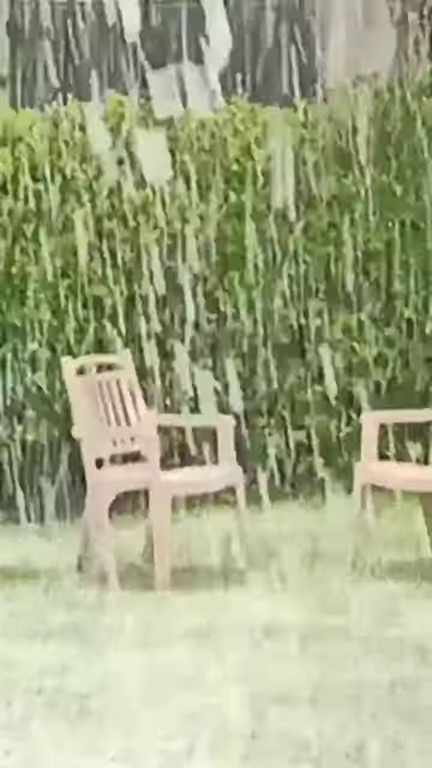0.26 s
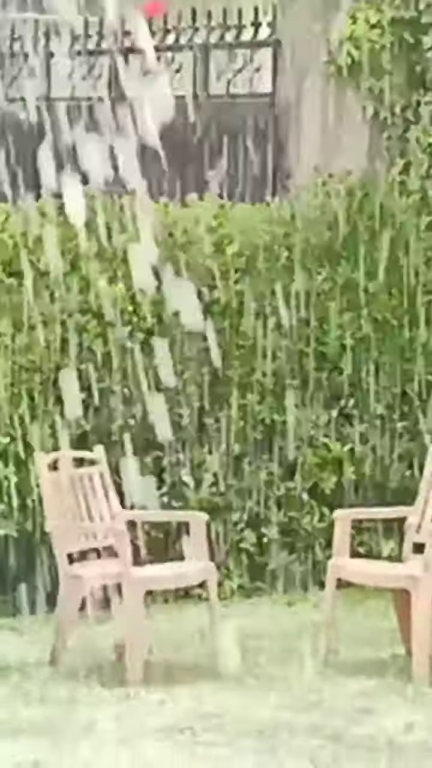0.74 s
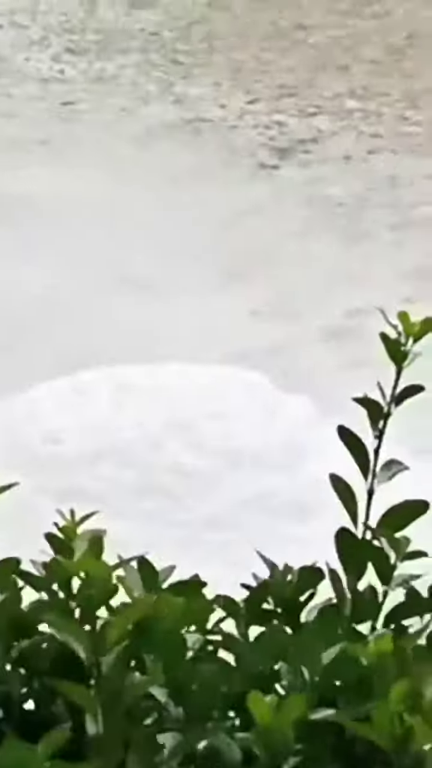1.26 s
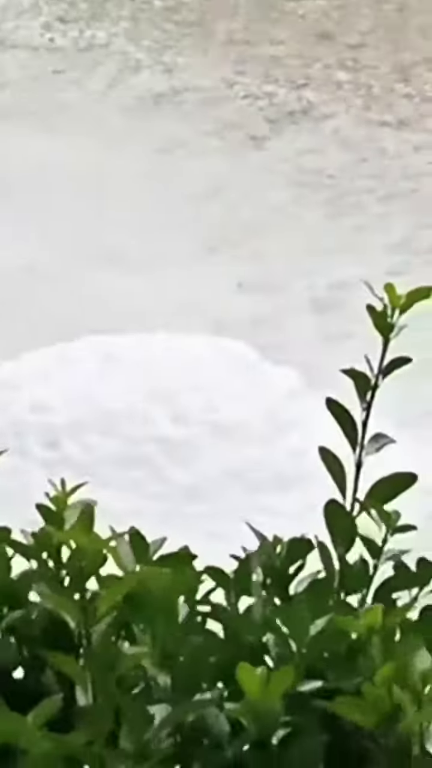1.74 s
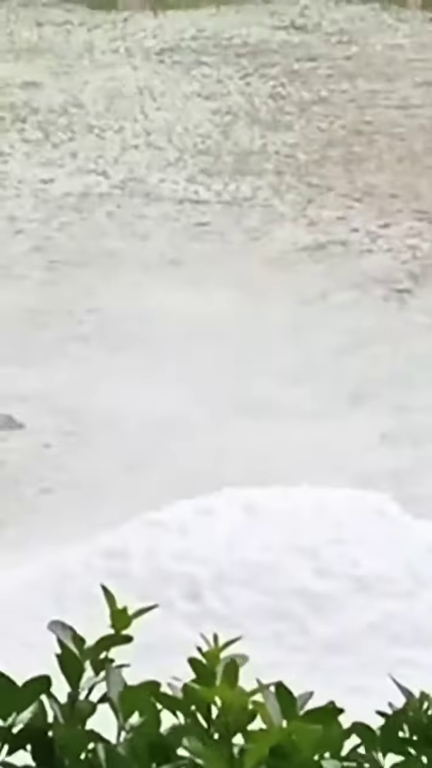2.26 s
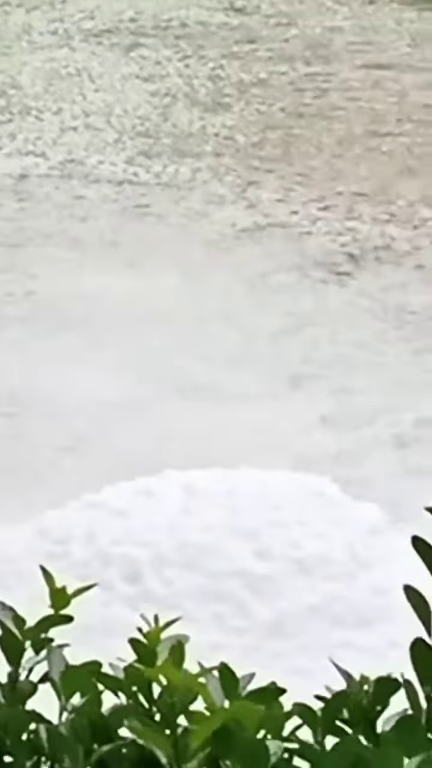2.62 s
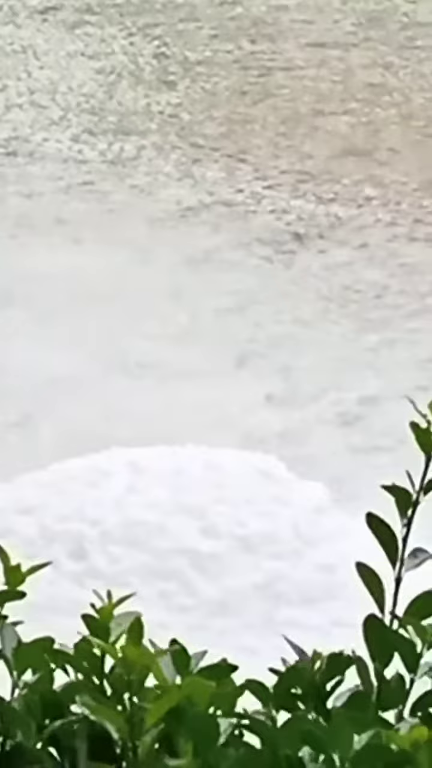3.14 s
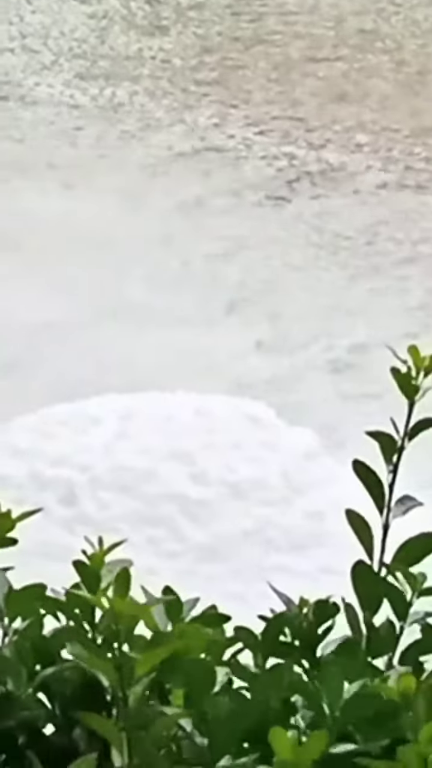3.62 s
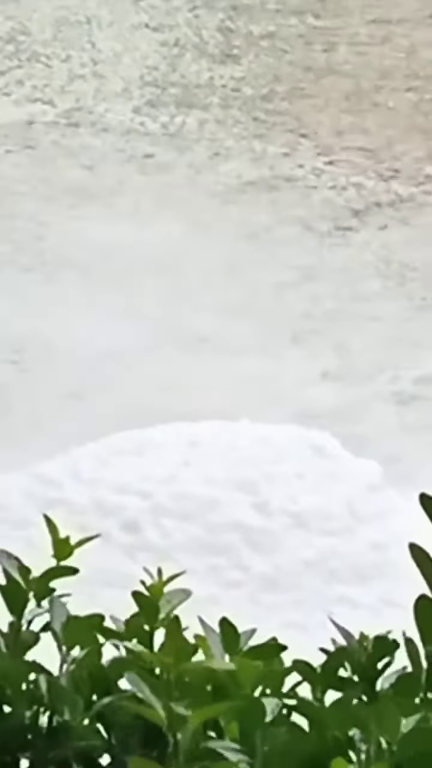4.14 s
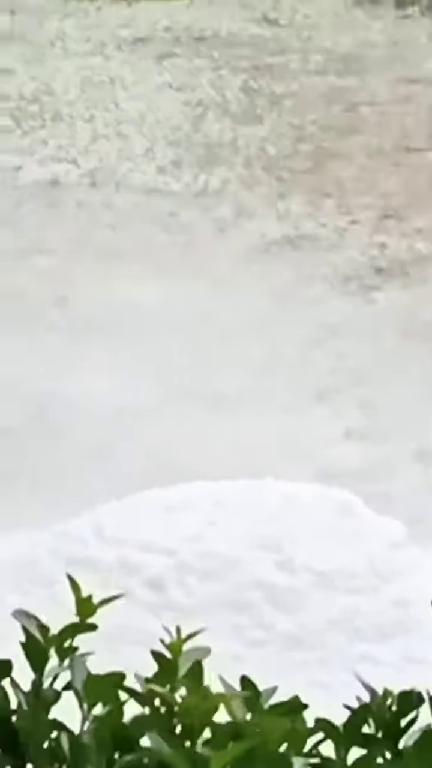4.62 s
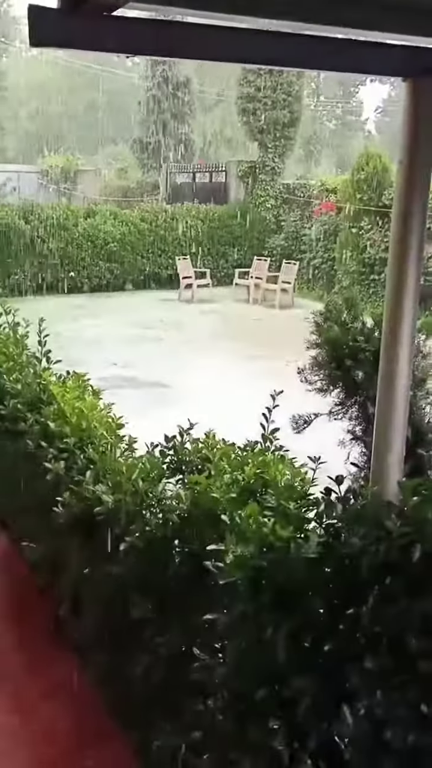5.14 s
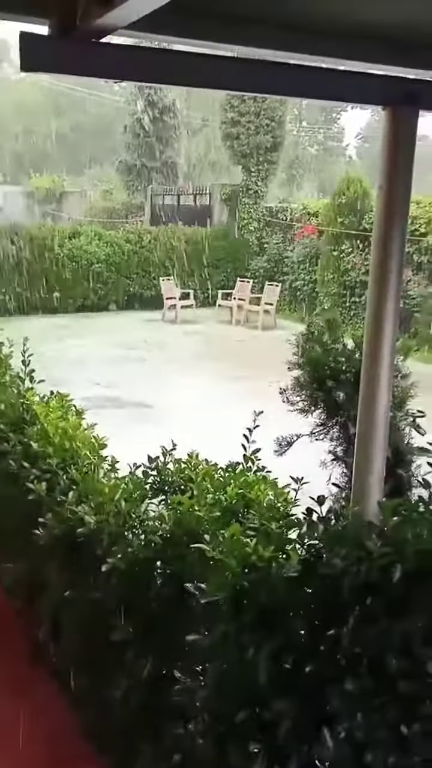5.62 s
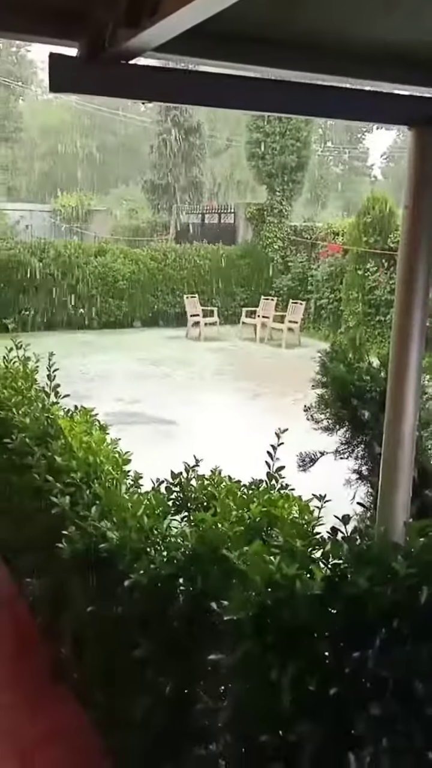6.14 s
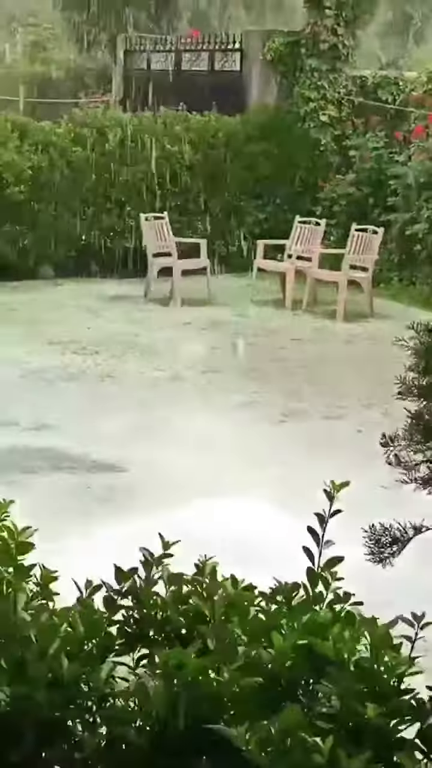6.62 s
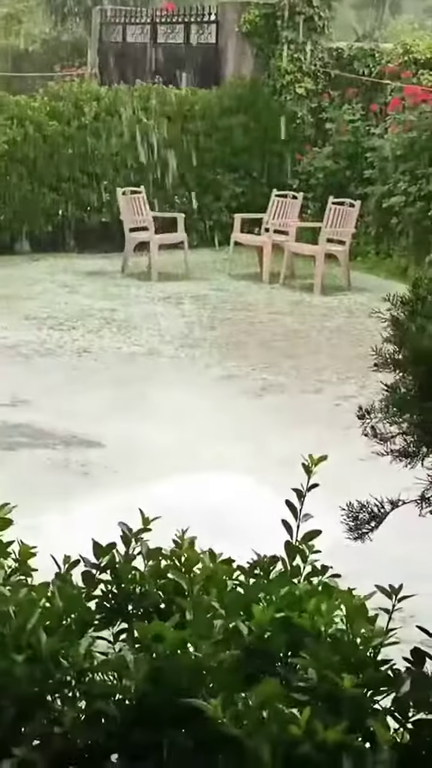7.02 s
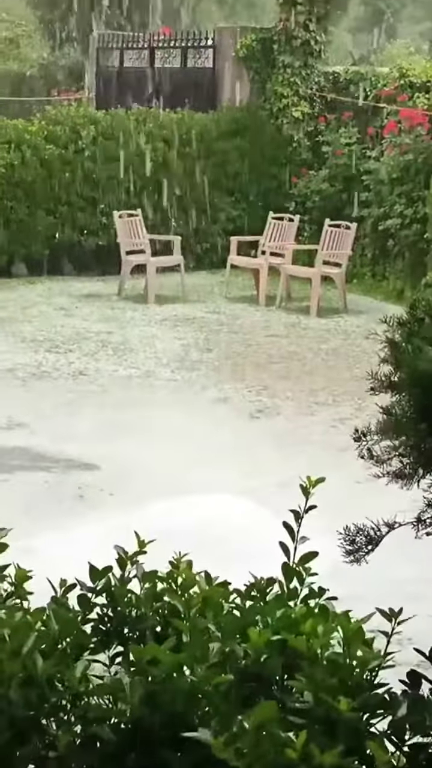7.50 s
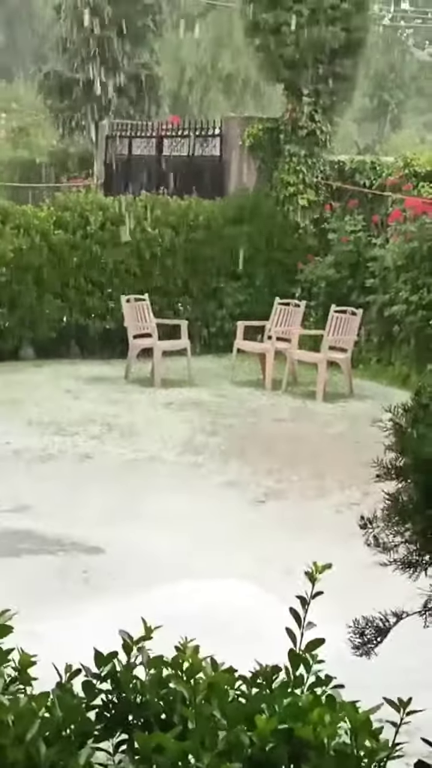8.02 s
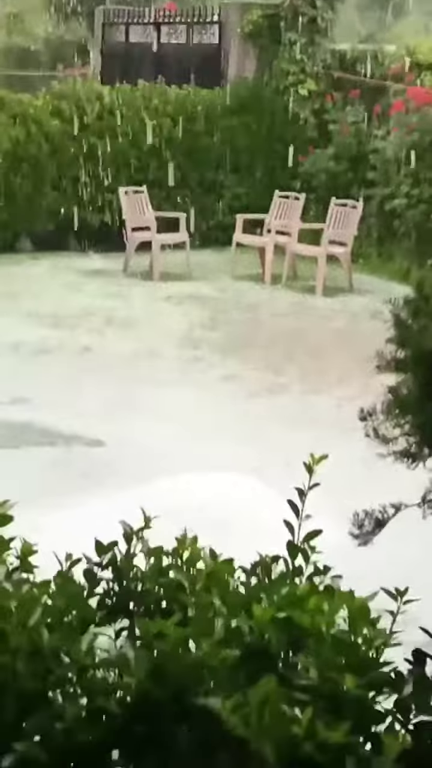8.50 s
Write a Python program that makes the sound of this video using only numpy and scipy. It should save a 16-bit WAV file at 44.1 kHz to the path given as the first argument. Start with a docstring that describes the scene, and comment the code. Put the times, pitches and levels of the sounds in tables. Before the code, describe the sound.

Dense hail fills a garden from start to finish, countless impacts blurring into a broad noisy roar. Beneath it lie a rolling low rumble and dull drumming on roof and soft ground; above, a bright hiss of ice ticking on ice. Ticks on leaves are strongest in the first second, then harder clatter takes over. Soft thuds and a few sharp cracks stand out. Wide stereo from under a porch, mostly leaning left.

```python
"""Heavy hail on a garden, heard from under a porch roof

Countless impacts on lawn and paving merge into a roar of noise; a deep rumble rolls beneath it, and the porch
roof and soft ground drum. Noise bursts and decaying sinusoids make the nearer stones, which patter in the hedge,
tick on the ice already lying, clack and knock. The fall surges and eases a little, with brief bursts of ice,
thuds and a few hard single hits; most of it lies to the left of the two microphones."""
import sys
import numpy as np
from scipy import signal
from scipy.fft import rfft, irfft, next_fast_len
from scipy.io import wavfile
from scipy.ndimage import uniform_filter1d, minimum_filter1d, map_coordinates

SR = 44100
rng = np.random.default_rng(int(sys.argv[2]) if len(sys.argv) > 2 else 0)


def unload_audio(sound):
    """Save the sound as a 16-bit wav file, at the path given as the first command line argument."""
    columns = np.transpose(np.atleast_2d(sound))
    # keep every value between -1 and 1, then stretch to whole-number steps
    steps = np.round(np.clip(columns, -1, 1) * 32767)
    wavfile.write(sys.argv[1], SR, steps.astype(np.int16))


N = 386307


def amp(db):
    """Decibel law: a level in dB becomes a gain in amplitude."""
    return 10 ** (np.asarray(db) / 20)


def unit(x):
    """Normalisation: scale to rms 1."""
    return x / np.sqrt(np.mean(x ** 2) + 1e-20)


def along(points, hz):
    """Logarithmic frequency scale: interpolate (f/Hz, value) points at the frequencies hz."""
    f, v = np.transpose(points)
    return np.interp(np.log(hz + 1), np.log(f + 1), v)


def curves(rows):
    """Linear interpolation in time: one value per sample for each column after t/s."""
    s, *cols = np.transpose(rows)
    return [np.interp(np.arange(N) / SR, s, c) for c in cols]


def wobble(rate):
    """Band-limited randomness: a smooth curve through random knots, rate of them per second."""
    knots = rng.standard_normal(int(N * rate / SR) + 4)
    return map_coordinates(knots, [np.arange(N) * rate / SR])


def filtered(x, response):
    """Convolution theorem: multiply the spectrum of x by a response of frequency."""
    size = next_fast_len(N + SR // 2)
    spectrum = rfft(x, size) * response(np.fft.rfftfreq(size, 1 / SR))
    return irfft(spectrum, size)[..., :N]


def pan(lean_db):
    """Interchannel level difference: left and right gains that differ by lean_db."""
    return amp(np.array([[.5], [-.5]]) * lean_db)


def add(track, start, sound):
    """Superposition: mix a sound into the track from a start time (s)."""
    part = track[..., max(round(start * SR), 0):][..., :sound.shape[-1]]
    part += sound[..., :part.shape[-1]]


def impacts(rate, spread_db, decay_ms):
    """Shot noise: power of random blows of log-normal size, each falling to 1/e in decay_ms; mean 1."""
    sizes = amp(spread_db * np.clip(rng.standard_normal((2, N)), -2, 2))
    lands = rng.random((2, N)) < rate / SR
    keep = np.exp(-1000 / (decay_ms * SR))
    power = signal.lfilter([1], [1, -keep], lands * sizes ** 2)
    return power / power.mean()


def shower(rate, spread_db, decay_ms, near_db):
    """Central limit: far stones blur into steady noise; near ones, near_db relative to it, stay tiny bursts."""
    power = 1 + amp(near_db) ** 2 * impacts(rate, spread_db, decay_ms)
    return unit(rng.standard_normal((2, N)) * np.sqrt(power))


def patchy(x, patchy_db, size=(5, 16)):
    """Spectro-temporal modulation: random gains over patches of size (bands, frames) make the noise flicker."""
    z = signal.stft(x, nperseg=512)[2]
    field = uniform_filter1d(rng.standard_normal(z.shape[1:]), size=size[0], axis=0)
    field = uniform_filter1d(field, size=size[1], axis=1)
    return unit(signal.istft(z * amp(patchy_db * unit(field)), nperseg=512)[1][:, :N])


def coloured(x, spectrum):
    """Minimum phase: each blow rings with the given spectrum only after it lands; rms 1."""
    size = 16384
    gain = np.maximum(amp(along(spectrum, np.fft.rfftfreq(size, 1 / SR))), 1e-6)
    # folding the cepstrum forward in time makes the response causal
    cepstrum = irfft(np.log(gain))
    cepstrum[1:size // 2] *= 2
    cepstrum[size // 2 + 1:] = 0
    response = irfft(np.exp(rfft(cepstrum)))
    return unit(signal.fftconvolve(x, response[None], axes=1)[:, :N])


# the sound's colour passes through three views: hedge (0), paving (1), whole garden (2): [t/s, view 0-2]
VIEW = [(0, 0), (1.15, 0), (1.35, 1), (4.5, 1), (4.8, 2), (8.76, 2)]


def in_view(x, spectra):
    """Spectral crossfade: the colour passes from one spectrum to the next as the view changes."""
    view, = curves(VIEW)
    total = 0
    for k, spectrum in enumerate(spectra):
        share = np.clip(1 - abs(view - k), 0, 1)
        total = total + share * coloured(x, spectrum)
    return total


# likeness of the two channels: [f/Hz, coherence 0-1]
ALIKE = [(40, .55), (85, .7), (170, .86), (300, .85), (460, .48), (660, .64), (850, .35), (1500, .26),
         (2200, .06), (8000, .02)]
# level difference of the channels: [f/Hz, left minus right level/dB]
LEAN = [(80, 0), (160, -0.5), (230, 2.5), (330, 0.5), (450, 0.5), (600, -2.3), (780, 2.5), (980, 1.5),
        (1300, 3.5), (2000, 3), (3200, 2), (4200, 1)]
# how much earlier the right microphone hears the sound: [f/Hz, lead/ms]
LEAD = [(200, .09), (330, .12), (465, .35), (590, .11), (720, .17), (810, .23), (1000, .29), (1300, .34),
        (1700, .3)]


def at_microphones(pair):
    """Partial coherence: long waves are largely shared; the left is mostly louder, the right earlier."""
    turn = lambda hz: np.arccos(np.clip(along(ALIKE, hz), 0, 1)) / 2
    mid, side = filtered(pair, lambda hz: np.array([np.cos(turn(hz)), np.sin(turn(hz))]))
    delay_s = lambda hz: np.array([[.5], [-.5]]) * along(LEAD, hz) / 1000
    ports = lambda hz: pan(along(LEAN, hz)) * np.exp(-2j * np.pi * hz * delay_s(hz))
    return filtered(np.array([mid + side, mid - side]), ports)


# the storm's deep rumble, before the fall and the roll shift it: [t/s, level/dB]
STORM = [(0, -36), (0.17, -39.5), (0.4, -36.5), (0.8, -36), (1.0, -36.5), (1.45, -32), (1.75, -35.5),
         (2, -28.5), (2.3, -32), (2.77, -28.5), (2.92, -33.5), (3.25, -28), (3.47, -34.5), (3.65, -31.5),
         (4.4, -34), (5.05, -31), (6.3, -32), (6.75, -31), (7.08, -33), (7.48, -29.5), (7.63, -31.5),
         (8.76, -32.5)]
# colour of the rumble: [f/Hz, level/dB]
RUMBLE = [(20, -33), (42, -20), (62, -5.5), (85, 1), (130, 3.5), (175, -2.5), (230, -31.5), (400, -75)]
# a stronger rumble is also deeper: below this edge (Hz) it swells further (extra dB per dB)
DEEP_HZ, DEEP_GROWS = 68, 1.3
# random rolling: knots per s, dB per unit of the random curve
ROLL_RATE, ROLL_DB = 8.3, 0.5


def rumble(fall_db):
    """Level-dependent spectrum: the deep, rolling sum of the storm swells most in its lowest part."""
    level_db, = curves(STORM)
    level_db = level_db + fall_db + ROLL_DB * wobble(ROLL_RATE)
    noise = coloured(rng.standard_normal((2, N)), RUMBLE)
    deep = filtered(noise, lambda hz: 1 / (1 + (hz / DEEP_HZ) ** 8))
    extra_db = DEEP_GROWS * (level_db - level_db.mean())
    return amp(level_db) * (noise - deep + amp(extra_db) * deep)


# drumming on roof and lawn, before the dips: [t/s, level/dB]
DRUM_LEVEL = [(0, -21), (0.85, -21.5), (1.02, -22.5), (1.2, -21.6), (1.55, -20.5), (1.95, -23), (2.15, -21),
              (2.32, -22.5), (2.68, -21), (3.0, -22.5), (3.45, -21.6), (4.2, -21.6), (5.3, -20.5),
              (5.5, -21.5), (6.05, -21.5), (6.4, -21.5), (6.8, -22), (7.85, -22), (8.76, -21.5)]
# colour of the drumming in each view: [f/Hz, level/dB]
DRUM_HEDGE = [(100, -40), (170, -4.5), (200, -8.5), (226, -7), (254, -7.5), (397, -2), (461, -7), (542, -3),
              (629, -6), (721, -2), (800, -10.5), (1040, -33), (1760, -120)]
DRUM_PAVING = [(100, -43), (170, -5), (248, -6.5), (307, -2.5), (340, -3), (392, -3.5), (598, -4),
               (650, -1.5), (689, -6.5), (800, -12.5), (1040, -36), (1760, -120)]
DRUM_GARDEN = [(100, -35.5), (170, -3.5), (194, -10), (231, -7.5), (309, -2.5), (361, -2.5), (483, -4.5),
               (522, -4), (650, -1.5), (780, -11.5), (800, -14.5), (1040, -35), (1760, -120)]


def drumming(dip_db):
    """Forced response: random blows on the porch roof and the lawn sound dull and low."""
    blows = shower(rate=390, spread_db=6.0, decay_ms=2.3, near_db=-5.0)
    level_db, = curves(DRUM_LEVEL)
    return amp(level_db + dip_db) * in_view(blows, [DRUM_HEDGE, DRUM_PAVING, DRUM_GARDEN])


# colour of the roar in each view: [f/Hz, level/dB]
ROAR_HEDGE = [(440, -29.5), (750, -7.5), (833, -7), (993, -2), (1070, -4), (1170, -2.5), (1920, -3),
              (2540, -7), (3110, -11.5), (3330, -12.5), (4000, -13.5), (5200, -32), (8800, -120)]
ROAR_PAVING = [(440, -37.5), (750, -0.5), (793, -5.5), (863, -0.5), (1100, -0.2), (1240, -3), (1530, -3.5),
               (1880, -2.5), (2760, -4), (3600, -7.5), (4000, -10.5), (5200, -44), (8800, -120)]
ROAR_GARDEN = [(440, -31), (750, -3.5), (782, -5.5), (863, 1), (952, -1.5), (1150, -0.5), (1310, -2.5),
               (1440, -2), (1740, -2), (2500, -3), (4000, -12.5), (5200, -47), (8800, -120)]
ROAR_DB = -16  # before the fall and the flurries shift it


def roar(fall_db, flurry):
    """Incoherent summation: stones clattering on the paving and through the hedge merge into noise."""
    blows = shower(rate=450, spread_db=0.5, decay_ms=1.0, near_db=-10.0)
    blows = patchy(blows, patchy_db=0.62)
    level_db = ROAR_DB + fall_db + 0.12 * flurry
    return amp(level_db) * in_view(blows, [ROAR_HEDGE, ROAR_PAVING, ROAR_GARDEN])


SPURTS_PER_S = 32  # knots of the random curves


def spurts():
    """Correlated modulation: a random swell for each channel, half of its power common to both."""
    common = wobble(SPURTS_PER_S)
    own = np.array([wobble(SPURTS_PER_S), wobble(SPURTS_PER_S)])
    return (common + own) / np.sqrt(2)


# where the treble comes from: [t/s, hiss left minus right level/dB, fizz left minus right level/dB]
FACING = [(0, -1, 2), (1.24, -0.5, 1), (1.29, 1, 11), (4.6, 1.5, 10.5), (8.3, -0.3, 13), (8.76, -0.5, 10)]
# the hiss, which slowly fades, before fall, bursts and spurts shift it: [t/s, level/dB]
HISS_LEVEL = [(0, -27.5), (1.3, -27.5), (2.7, -29), (4.1, -28), (5.6, -29), (7, -29.5), (7.6, -30.5),
              (8.76, -31)]
# colour of the hiss: [f/Hz, level/dB]
HISS = [(3300, -36), (3900, -4.5), (4400, 2.5), (5200, 1.5), (5450, -6.5), (6200, -9), (6450, 5), (6750, 5),
        (7200, -0.5), (7900, -25.5), (9000, -23), (12000, -92)]
# growth with the fall (dB per dB), depth of the spurts (dB per unit of swell)
HISS_GROWS, HISS_SPURT_DB = 0.82, .6


def hiss(fall_db, flurry, burst_db):
    """Amplitude modulation: ice ticking on ice in spurts is a bright noise band of random level."""
    lean_db, _ = curves(FACING)
    level_db, = curves(HISS_LEVEL)
    ticks = shower(rate=600, spread_db=1.0, decay_ms=3.1, near_db=-7)
    ticks = coloured(patchy(ticks, patchy_db=1.35, size=(9, 7)), HISS)
    level_db = level_db + HISS_GROWS * fall_db + burst_db + HISS_SPURT_DB * spurts() + 0.16 * flurry
    return amp(level_db) * pan(lean_db) * ticks


# the fizz, before fall, bursts and spurts shift it: [t/s, level/dB]
FIZZ_LEVEL = [(0, -46.5), (1.2, -48), (1.4, -48.5), (2.6, -51), (4, -49.5), (5.4, -49.5), (6.3, -50),
              (7.2, -48.5), (8.76, -50)]
# colour of the fizz: [f/Hz, level/dB]
FIZZ = [(6500, -56), (7400, -25), (8300, 3.5), (9800, 2), (11600, 4.5), (12700, -0.5), (13100, -10),
        (13800, -6), (14150, 5), (14700, 2), (15100, -12), (15700, -11)]
# growth with the fall (dB per dB), depth of the spurts (dB per unit of swell)
FIZZ_GROWS, FIZZ_SPURT_DB = 0.66, .5


def fizz(fall_db, burst_db):
    """Short impulses, high spectrum: ice ticking on ice also gives a faint fizz above the hiss."""
    _, lean_db = curves(FACING)
    level_db, = curves(FIZZ_LEVEL)
    ticks = shower(rate=560, spread_db=2, decay_ms=1.2, near_db=-11)
    ticks = coloured(patchy(ticks, patchy_db=1.5, size=(30, 8)), FIZZ)
    level_db = level_db + FIZZ_GROWS * fall_db + burst_db + FIZZ_SPURT_DB * spurts()
    return amp(level_db) * pan(lean_db) * ticks


def stones(rate, pitch_hz, octaves, cycles, spread_db):
    """Damped oscillation: stones at random moments ring for a few cycles, each with its own pitch; rms 1."""
    count = int(np.clip(rate * N / SR, 1, 8000))
    draws = rng.standard_normal((count, 4))
    starts = rng.integers(0, N, count)
    pitch, size, side, life = np.clip(draws, -1.8, 1.8).T[:, :, None]
    age = np.arange(int(3 * cycles * SR / pitch_hz))
    turns = pitch_hz * 2 ** (octaves * pitch) * age / SR
    # the amplitude falls by 60 dB over about this many cycles
    decay = np.exp(-np.log(1000) * turns / (cycles * 2 ** (life / 2)))
    ring = amp(spread_db * size) * np.sin(2 * np.pi * turns) * decay
    where = (starts[:, None] + age).ravel()
    channels = []
    for way in (1, -1):
        placed = ring * np.cos(np.pi / 4 + way * side / 2)
        channels.append(np.bincount(where, placed.ravel(), N)[:N])
    return unit(np.array(channels))


# the nearest ticks, strongest beside the hedge, before the bursts: [t/s, level/dB]
TICK_LEVEL = [(0, -39), (1.25, -37), (1.6, -44.5), (7, -43), (8.76, -45)]
# colour of a tick, a clack and a knock: [f/Hz, level/dB]
TICK_COLOUR = [(300, -40), (1000, -15), (2500, 2), (4200, -6), (5200, -21), (5800, 3), (6800, -7),
               (7900, -9), (12000, -20), (15700, -28)]
CLACK_COLOUR = [(300, -40), (900, -4), (2000, 0), (3300, 2), (5200, -9), (8000, -32)]
KNOCK_COLOUR = [(70, -50), (200, -4), (330, 0), (700, 0), (1500, -30), (4000, -60)]
# levels before the fall and the dips shift them (dB)
CLACK_DB, KNOCK_DB = -26.5, -31.5


def near_stones(fall_db, dip_db, burst_db):
    """Resolved impacts: ticks on leaves and ice, clacks on paving and knocks on the roof stand out."""
    tick_db, = curves(TICK_LEVEL)
    ticks = stones(rate=200, pitch_hz=4000, octaves=.35, cycles=7, spread_db=4)
    clacks = stones(rate=380, pitch_hz=2700, octaves=.4, cycles=9, spread_db=3)
    knocks = stones(rate=100, pitch_hz=440, octaves=.25, cycles=8, spread_db=2)
    hard = amp(CLACK_DB + fall_db) * coloured(clacks, CLACK_COLOUR)
    hard = hard + amp(KNOCK_DB + dip_db) * coloured(knocks, KNOCK_COLOUR)
    return amp(tick_db + burst_db) * coloured(ticks, TICK_COLOUR) + at_microphones(hard)


# handfuls of stones burst on leaves and ice nearby:
# [middle t/s, half-length/s, rise of the hiss level/dB, of the fizz level/dB, of the roar level/dB]
BURSTS = [(0.281, .06, 1.5, 2, -0.2), (0.404, .06, 1.6, 0, 0.7), (0.692, 0.042, 3.5, 2, 1),
          (0.77, 0.074, 3, -1, 1), (1.15, .08, 1, 1, -1), (1.443, 0.05, 4, 1, 1), (1.52, 0.055, -1, 0, 1.5),
          (1.673, .04, 1, 1.3, 1.5), (1.81, 0.066, 3, 3.8, 2), (2.025, .05, 2.5, 2, 0.3),
          (2.392, .04, 3, 1.5, 0.5), (2.48, .04, 3, 2.6, .8), (2.653, 0.073, 0, 2, 1),
          (2.947, .045, 3, 1, 0), (3.124, 0.081, 1.6, 3, 1), (3.5, .045, 1, 3, 1.5),
          (3.63, .04, 2.3, .5, -0.5), (4.02, .04, 1.5, 3, 0.5), (4.075, .035, .5, 3, .5),
          (4.667, .045, 1, 3, 1), (4.971, .035, 1, 1.8, 0), (5.05, 0.044, 2.2, 0, -1.5),
          (5.32, .055, 2.3, 2, 0.5), (5.97, 0.034, 4, .5, 0.5), (6.082, 0.036, 3, 0, .5),
          (6.4, 0.055, 2, 2, -1), (6.617, .05, 2.5, -1, 1), (6.73, .055, 3.8, 2, 0.5),
          (6.964, .05, 2.6, .5, 0), (7.074, .08, 1.2, 0, 0.5), (7.437, .04, 2.2, .5, 1.5),
          (7.598, .04, 1.6, 1, 2), (7.97, .05, 3.5, 2.4, 1.5), (8.13, .035, 0, 0, 1.3),
          (8.395, .05, 2.5, 2, 0.7), (8.515, .035, 1.8, 4, 0)]


def bursts():
    """Raised-cosine envelope: each burst shifts hiss, fizz and roar smoothly and back (dB)."""
    t = np.arange(N) / SR
    rise_db = np.zeros((3, N))
    for middle, half_length, *peaks_db in BURSTS:
        near = abs(t - middle) < half_length
        shape = np.cos(np.pi / 2 * (t[near] - middle) / half_length) ** 2
        rise_db[:, near] += np.outer(peaks_db, shape)
    return rise_db


# single stones that crack on the paving close by: [t/s, level/dB, left minus right level/dB]
HITS = [(0.401, -23, 8), (0.772, -23, 7), (2.378, -19, 8), (3.158, -23, 5), (5.305, -17.5, 6),
        (6.45, -19, 10), (6.654, -24, 7), (7.597, -20, 5), (7.959, -21, 8), (8.645, -18, 1)]
# colour of such a crack: [f/Hz, level/dB]
HIT_COLOUR = [(500, -25), (1500, -5), (3300, 0), (6800, -8), (8200, -32), (15000, -42)]
HIT_T60_S = .012


def hits():
    """Transient excitation: a close stone shatters in one short, bright crack of decaying noise."""
    t = np.arange(SR // 40) / SR
    hz = np.fft.rfftfreq(2 * len(t), 1 / SR)
    colour = unit(amp(along(HIT_COLOUR, hz)))
    shape = np.exp(-np.log(1000) * t / HIT_T60_S)
    paving = np.zeros((2, N))
    for start, db, lean_db in HITS:
        noise = shape * rng.standard_normal((2, len(t)))
        crack = irfft(rfft(noise, 2 * len(t)) * colour)
        add(paving, start, amp(db) * pan(lean_db) * crack[:, :len(t)])
    return paving


# clumps of heavy stones thud on the roof: [t/s, pitch f/Hz, level/dB]
THUDS = [(0.55, 740, -22), (1.1, 700, -26), (1.49, 560, -24), (2.08, 348, -27), (2.14, 506, -20.5),
         (2.6, 315, -24), (2.66, 340, -27), (2.74, 310, -22), (2.98, 410, -23), (3.81, 355, -23),
         (4.0, 600, -31), (4.36, 390, -26), (4.79, 310, -21), (5.27, 314, -21), (5.81, 600, -26),
         (5.98, 370, -24), (6.05, 560, -20.5), (6.59, 352, -23), (6.77, 400, -32), (7.45, 370, -22.5),
         (7.72, 343, -23), (8.43, 380, -24)]
# build-up and 60 dB decay (s), standard deviation of the band of roof modes (octaves)
THUD_ATTACK_S, THUD_T60_S, THUD_OCTAVES = 0.026, 0.35, .22


def thuds():
    """Modal excitation: each clump stirs a narrow band of the roof's modes, which soon die away."""
    t = np.arange(SR // 3) / SR
    hz = np.fft.rfftfreq(len(t), 1 / SR) + 1
    decay = np.exp(-np.log(1000) * np.maximum(t - THUD_ATTACK_S, 0) / THUD_T60_S)
    shape = np.minimum(t / THUD_ATTACK_S, 1) * decay
    roof = np.zeros((2, N))
    for start, pitch_hz, db in THUDS:
        band = np.exp(-.5 * (np.log2(hz / pitch_hz) / THUD_OCTAVES) ** 2)
        ring = shape * irfft(rfft(rng.standard_normal((2, len(t)))) * band, len(t))
        # every thud gets the energy of its envelope
        ring = np.linalg.norm(shape) * ring / np.linalg.norm(ring, axis=1, keepdims=True)
        add(roof, start, amp(db) * ring)
    return roof


# the level dips briefly; a negative depth is a rise:
# [t/s, hold/s, depth in the roar level/dB, in the drumming level/dB, in the low middle level/dB]
DIPS = [(0.96, 0.033, 1, 0.5, -0.5), (1.37, 0.022, 1, 1.5, 0), (1.73, 0.022, 1, 1.5, 3),
        (1.937, 0.018, .3, 2.5, -3), (2.308, .017, 1, -2.5, 1), (6.156, 0.14, 1.5, 2.3, -0.5),
        (6.225, 0.065, 0, -1, 4), (7.207, .02, 1, -0.5, 3), (7.797, .035, -0.2, 2.5, -0.5),
        (8.603, 0.02, 2, 6, 3)]
# a dip sets in quickly (s); its recovery lasts a multiple of its hold
DIP_ATTACK_S, DIP_RELEASE_HOLDS = 0.012, 2.2


def dips():
    """Trapezoidal envelope: attack, hold and release shift roar, drumming and low middle (dB)."""
    t = np.arange(N) / SR
    change_db = np.zeros((3, N))
    for start, hold, *depths_db in DIPS:
        corners = start + np.cumsum([0, DIP_ATTACK_S, hold, DIP_RELEASE_HOLDS * hold])
        change_db -= np.outer(depths_db, np.interp(t, corners, [0, 1, 1, 0]))
    return change_db


# the low middle: centre (Hz), standard deviation (octaves)
MIDDLE_HZ, MIDDLE_OCTAVES = 680, 0.34


def thinned(x, change_db):
    """Band-selective gain: only the low middle changes its level."""
    band = lambda hz: np.exp(-.5 * (np.log2((hz + 1) / MIDDLE_HZ) / MIDDLE_OCTAVES) ** 2)
    return x + (amp(change_db) - 1) * filtered(x, band)


# slow level shift of rumble, roar, hiss, fizz and clacks: [t/s, shift/dB]
FALL = [(0, -1), (0.7, -1), (1.1, -0.9), (1.55, -1.5), (2.15, -1.5), (2.7, -1.1), (3.1, -1.2), (3.9, -1.55),
        (5.3, -0.3), (6.05, -1), (6.85, -1.5), (7.1, -0.5), (7.3, -1.9), (8.5, -2), (8.76, -0.7)]
# flurries of stones: slow and quick swells (knots per s), size of the quick over the slow
FLURRY_RATE, FLUTTER_RATE, FLUTTER_SIZE = 14, 45, 1.6


def scene():
    """Common modulation: all but the drumming, thuds, knocks, ticks and hits follow the fall."""
    dip_db, drum_dip_db, middle_dip_db = dips()
    hiss_burst_db, fizz_burst_db, roar_burst_db = bursts()
    fall_db = curves(FALL)[0] + dip_db
    roar_fall_db = fall_db + roar_burst_db
    flurry = wobble(FLURRY_RATE) + FLUTTER_SIZE * wobble(FLUTTER_RATE)
    garden = rumble(fall_db) + drumming(drum_dip_db) + thuds() + roar(roar_fall_db, flurry)
    treble = hiss(fall_db, flurry, hiss_burst_db) + fizz(fall_db, fizz_burst_db)
    near = near_stones(roar_fall_db, drum_dip_db, hiss_burst_db) + hits()
    return at_microphones(thinned(garden, middle_dip_db)) + treble + near


TOP_HZ = 15720  # band limit


def record(dry):
    """Peak limiting and band limiting: a smooth gain eases down high peaks; nothing is kept above TOP_HZ."""
    ceiling = .93
    needed = ceiling / np.maximum(abs(dry).max(axis=0), ceiling)
    gain = uniform_filter1d(minimum_filter1d(needed, size=201), size=201)
    return filtered(dry * gain, lambda hz: hz < TOP_HZ)


dry = scene()
out = record(dry)
unload_audio(out)
```